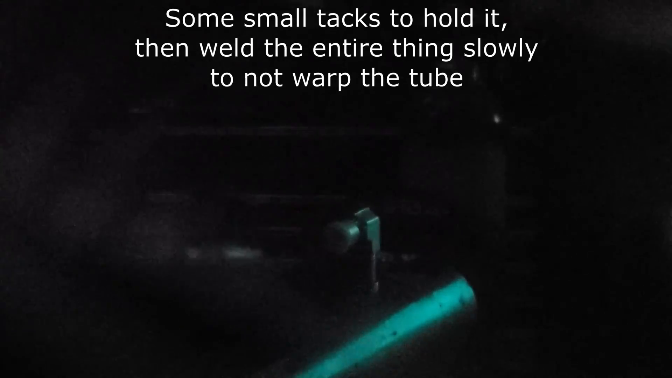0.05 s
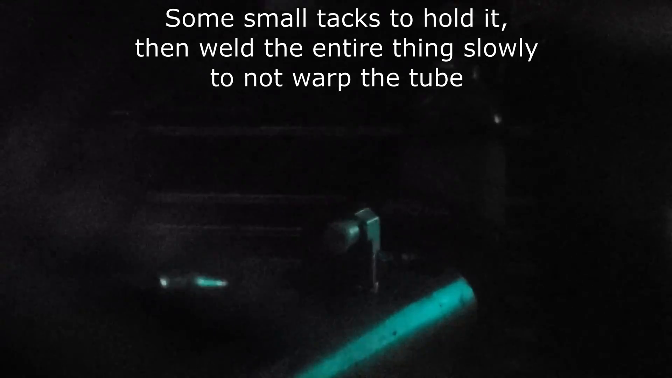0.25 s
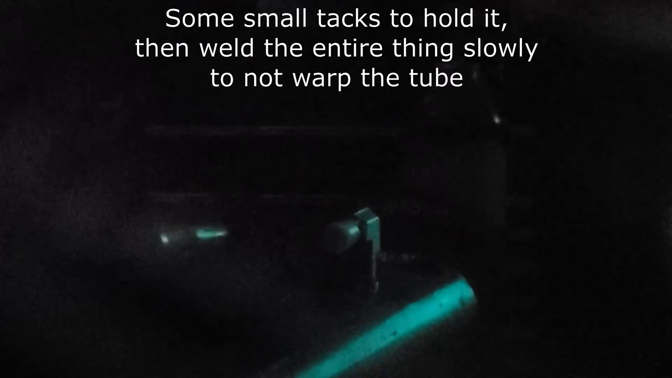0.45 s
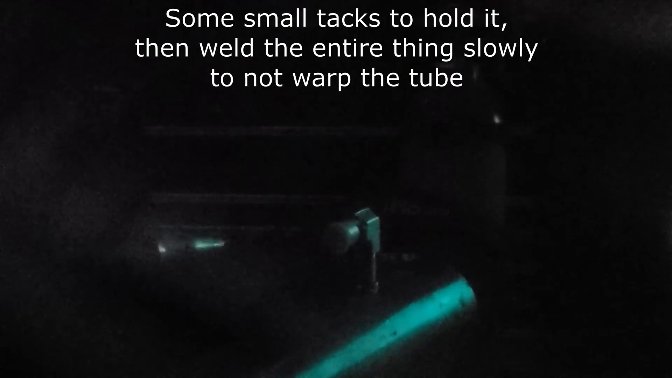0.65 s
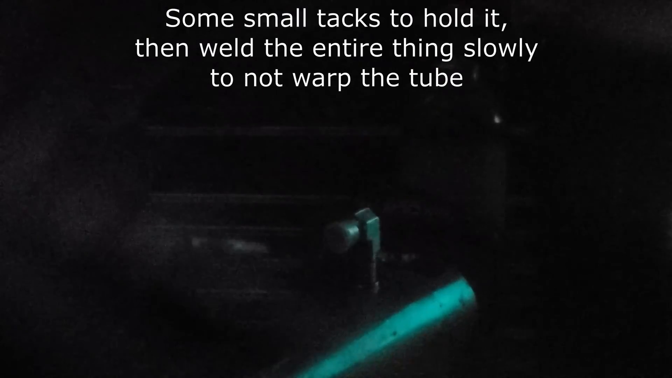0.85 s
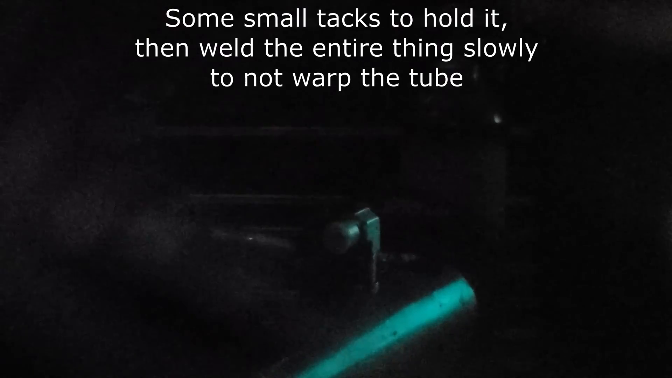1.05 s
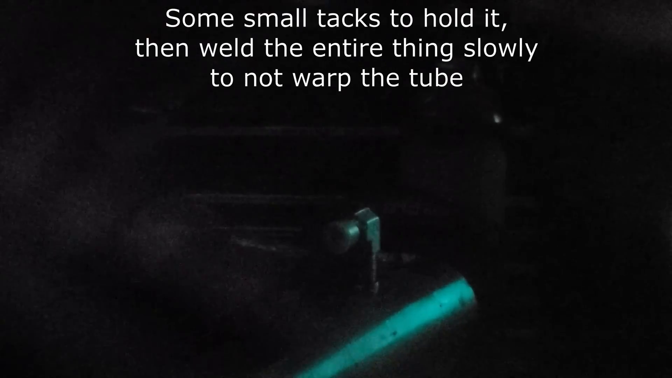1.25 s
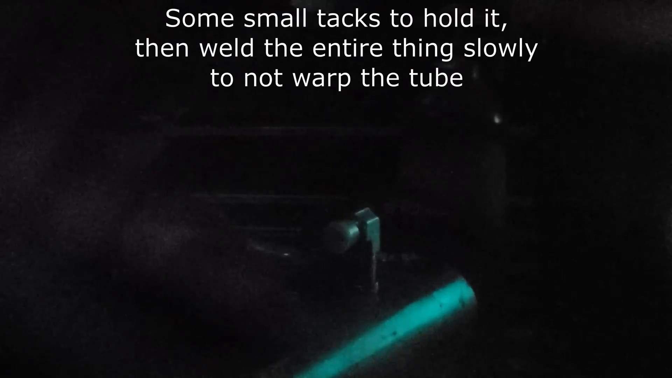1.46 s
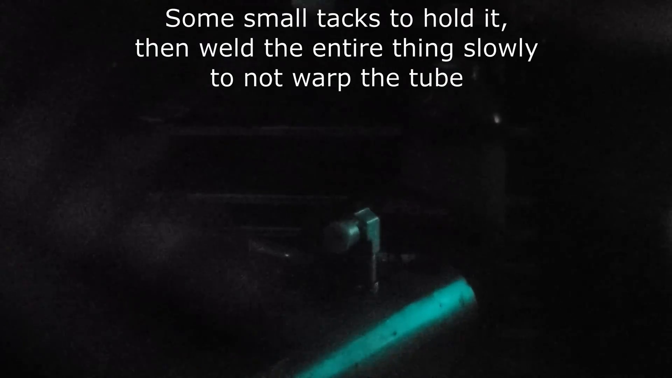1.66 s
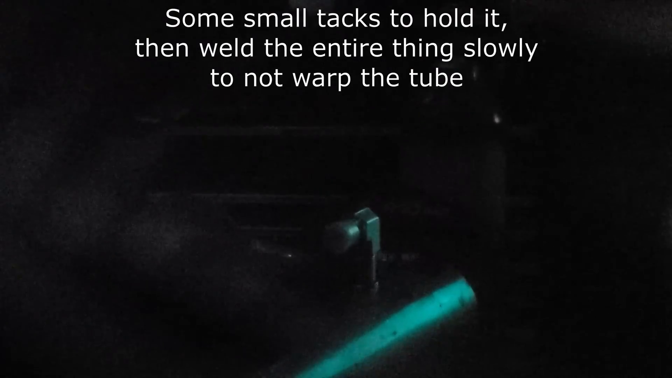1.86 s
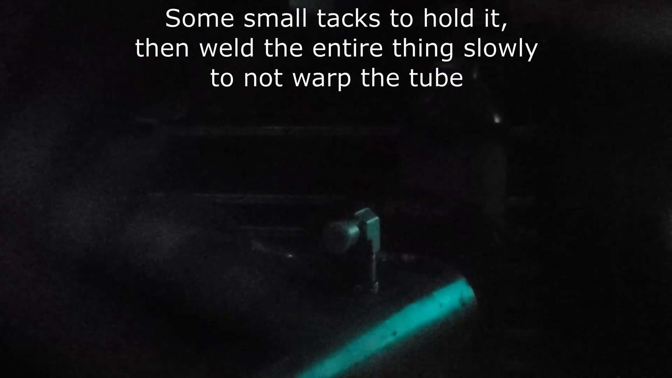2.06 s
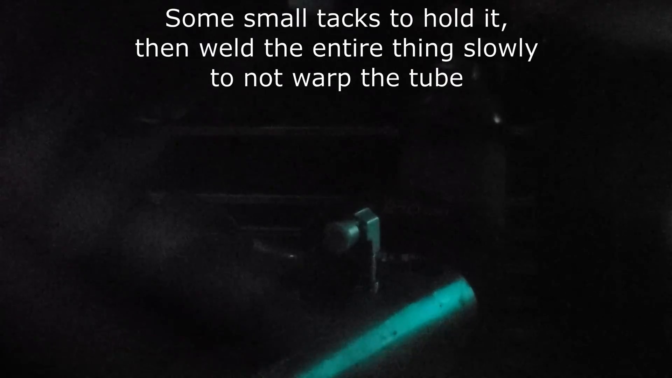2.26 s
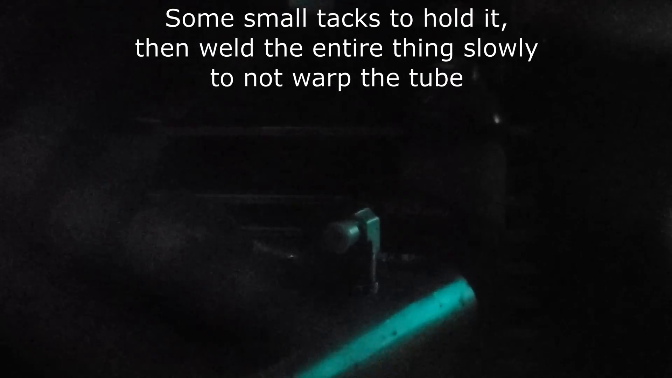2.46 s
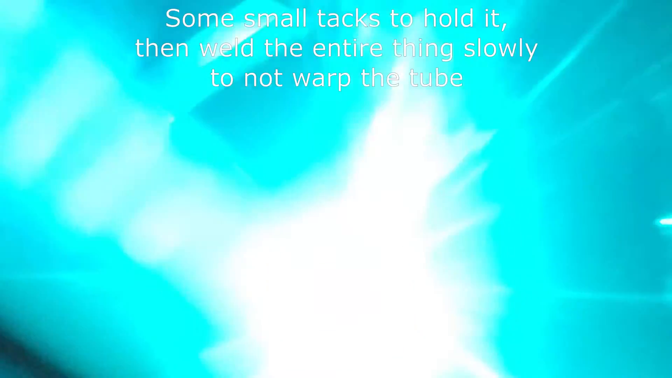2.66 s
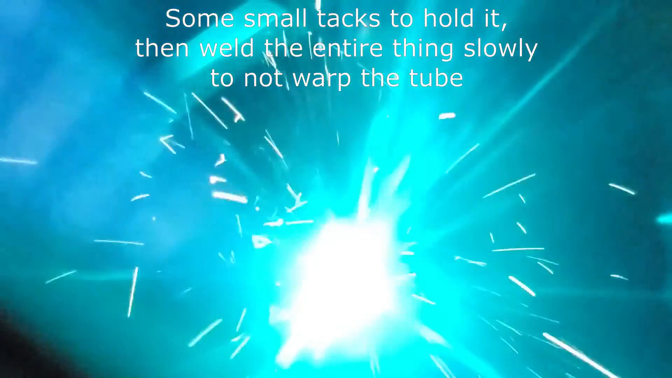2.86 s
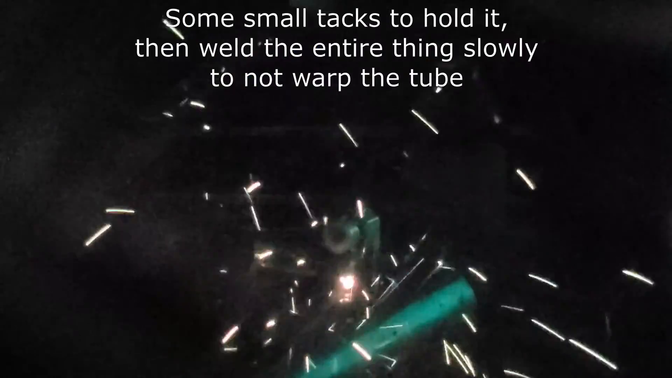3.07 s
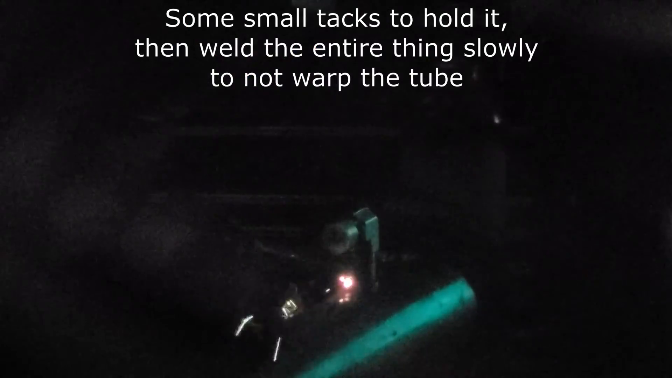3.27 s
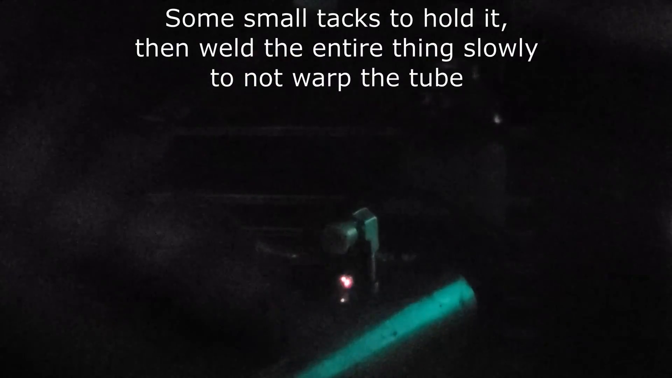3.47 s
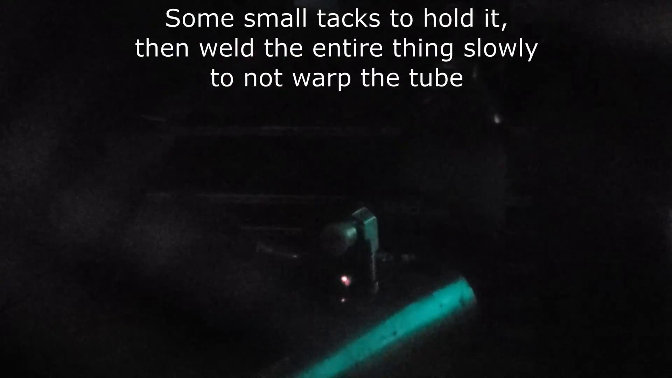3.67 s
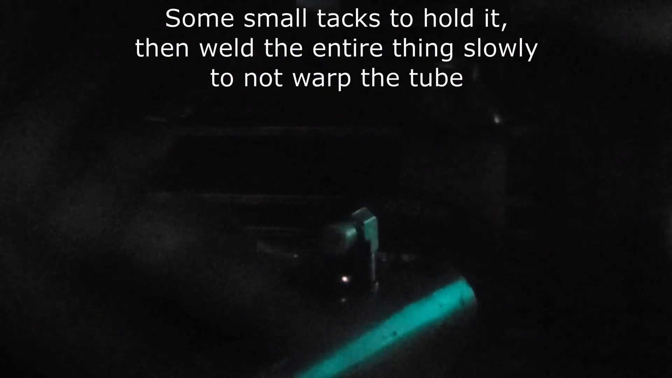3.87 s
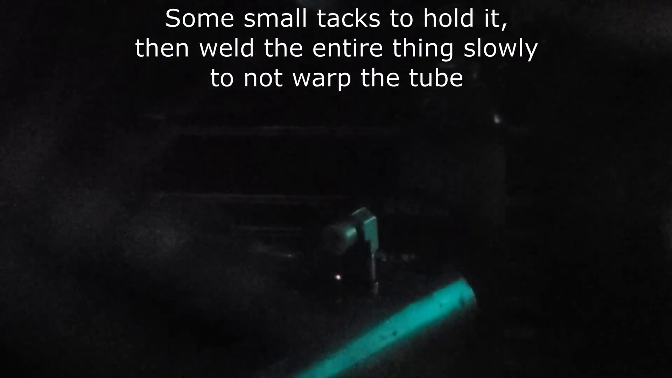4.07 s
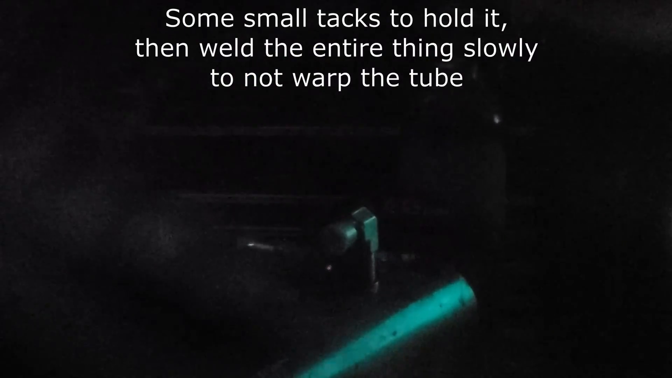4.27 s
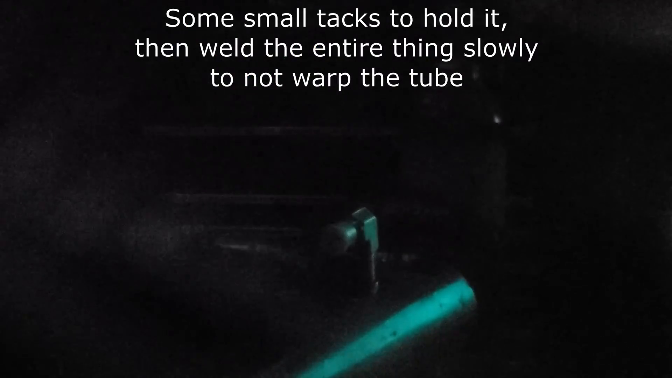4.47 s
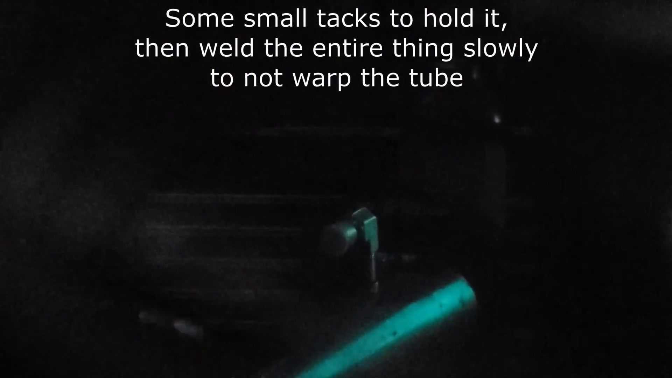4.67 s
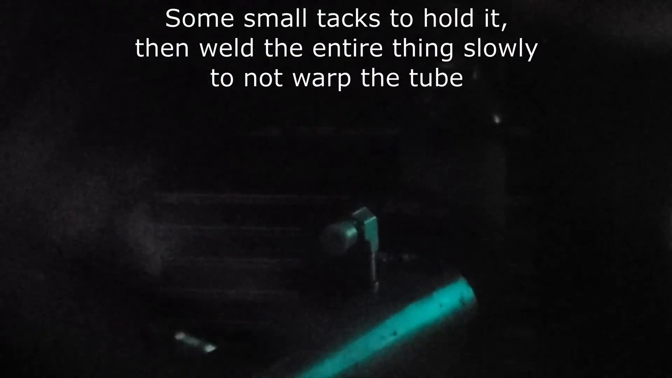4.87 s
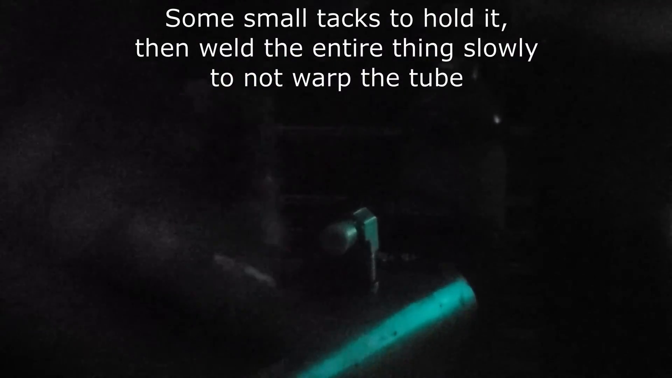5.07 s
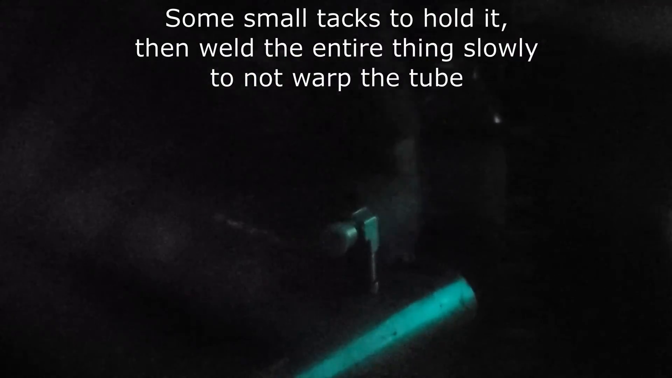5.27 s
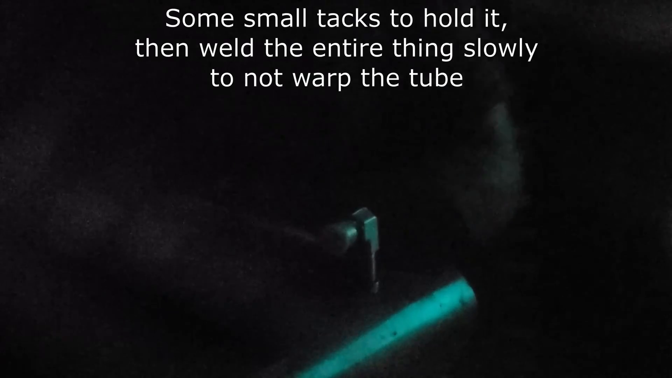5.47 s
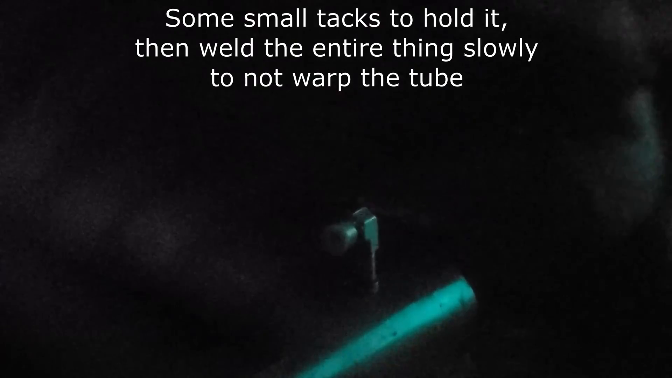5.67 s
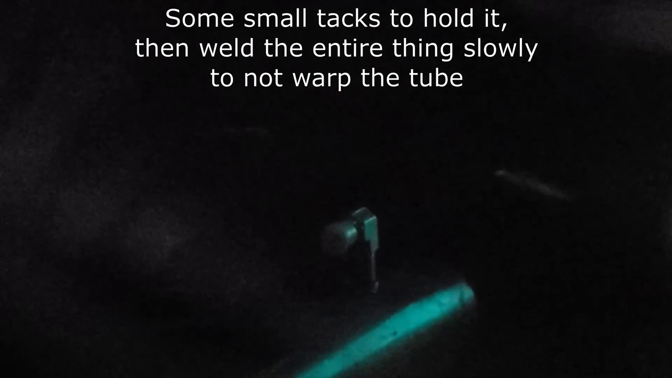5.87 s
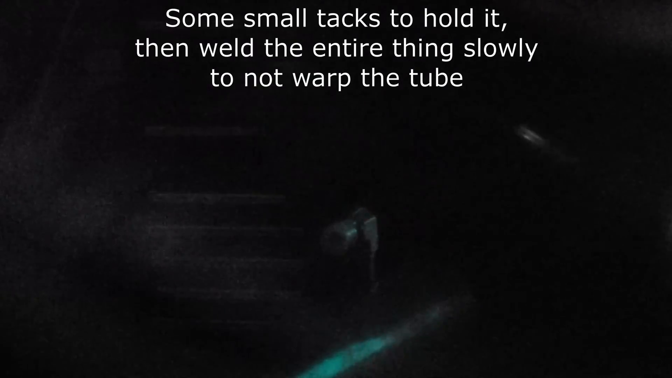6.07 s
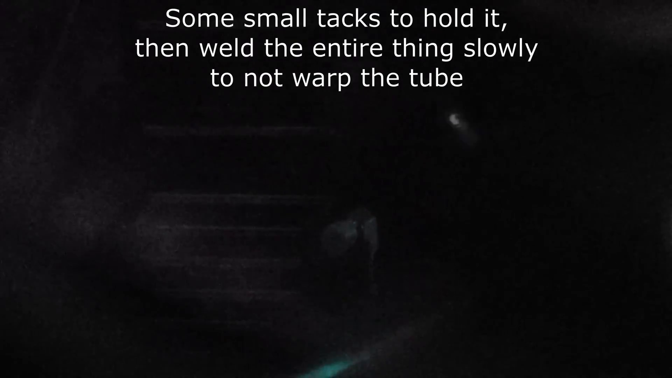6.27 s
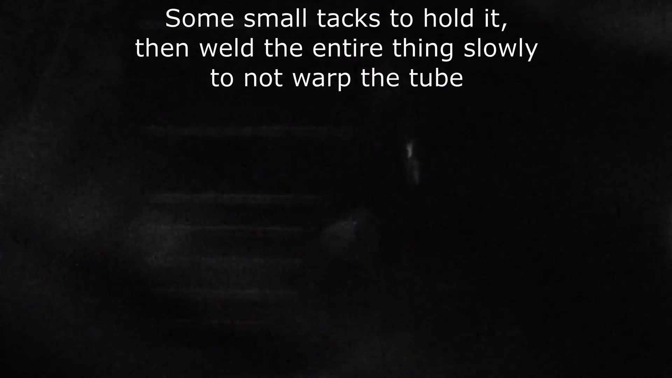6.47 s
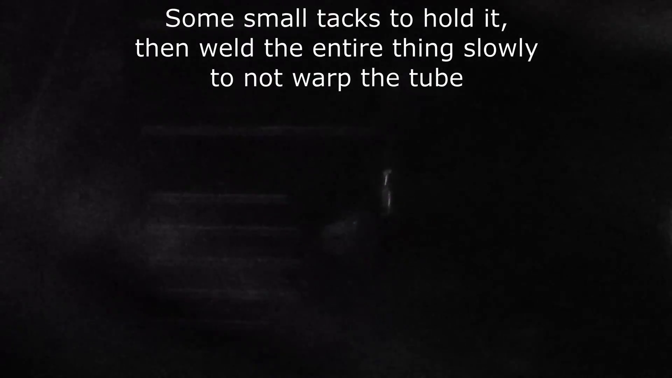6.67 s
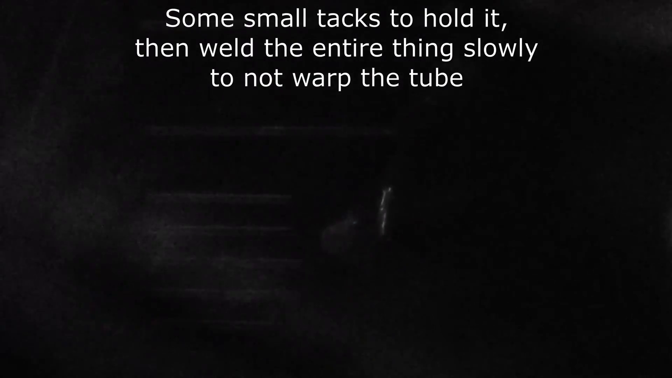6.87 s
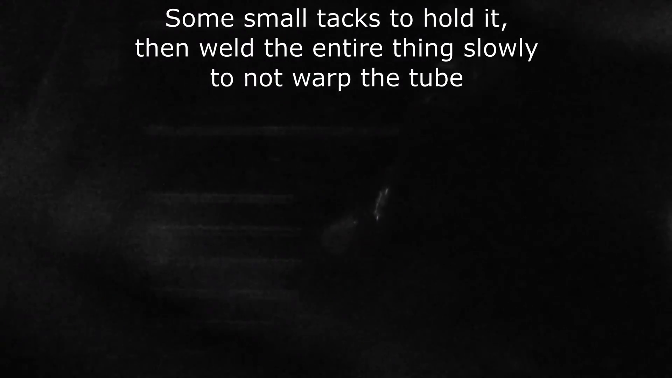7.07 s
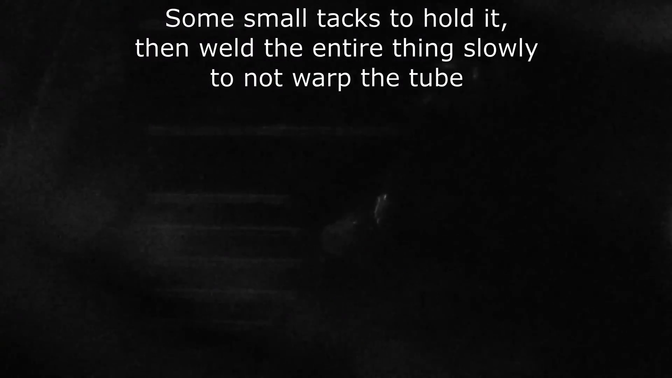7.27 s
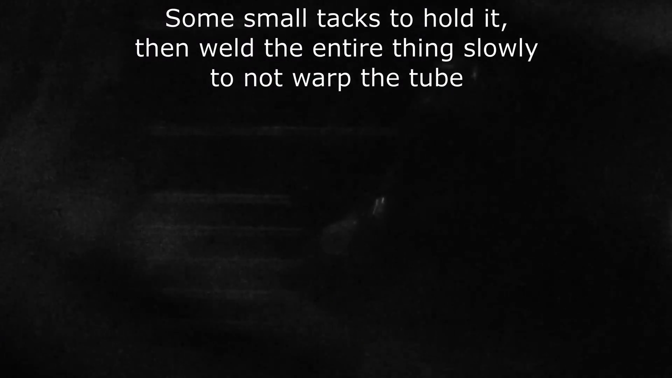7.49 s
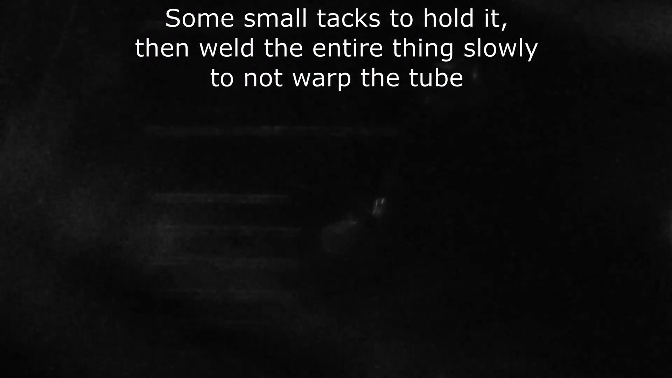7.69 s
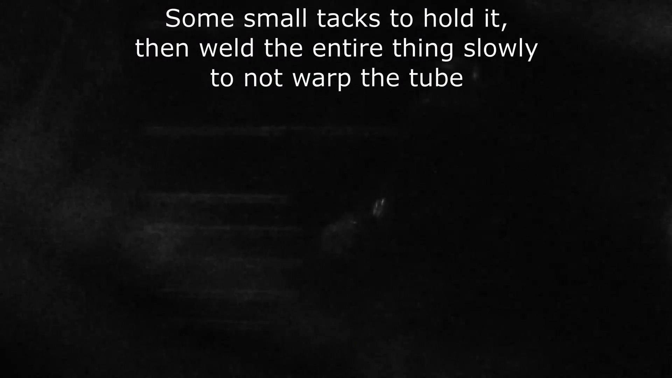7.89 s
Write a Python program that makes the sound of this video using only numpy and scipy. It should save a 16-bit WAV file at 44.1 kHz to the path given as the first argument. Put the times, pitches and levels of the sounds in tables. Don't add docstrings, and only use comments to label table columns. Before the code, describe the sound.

A welding machine's fan whirrs throughout, a breathy rush with thin motor tones, over uneven low traffic boom through workshop walls. Faint scuffs come at 0.25, 0.6 and 0.95 s. From about 1.2 to 2.3 s a lorry's deep engine note rises, pulls hard and eases off. Shielding gas starts hissing at 2.5 s. At 2.6 s the wire strikes with sharp snaps, thickening into fierce, dense crackling and sizzling until 3.0 s, then cutting off into a short room echo as the gas stops. The fan and traffic are ducked by the recorder, recovering after 4.1 s. At 4.4 s the torch lightly taps a tube, which rings briefly. Small knocks and scuffs continue between 4.8 and 6.9 s, clearest near 5.8 and 6.4 s. A car's falling, pulsing drone passes at 5.8-6.6 s. Fan and rumble carry on to 8 s. The close visor hollows the right side.

```python
import sys
import numpy as np
from scipy import signal
from scipy.io import wavfile
from scipy.ndimage import uniform_filter1d

SR = 44100
rng = np.random.default_rng(int(sys.argv[2]) if len(sys.argv) > 2 else 0)


def bounce(signal):
    frames = np.transpose(np.atleast_2d(signal))
    limited = np.clip(frames, -1, 1)
    pcm = np.round(limited * 32767).astype(np.int16)
    wavfile.write(sys.argv[1], SR, pcm)


def ratio_of_db(decibels):
    return 10 ** (np.asarray(decibels, float) / 20)


N = 349713

VISOR_S, VISOR_BOUNCE = 0.00075, 3.2
ARC_VISOR_S = 0.00072
STRIKE_S = 2.6137


def rms_one(x):
    return x / np.sqrt(np.mean(x ** 2) + 1e-20)


def since(s):
    return np.maximum(np.arange(N) / SR - s, 0)


def in_time(rows, outside=None):
    s, *columns = np.transpose(rows)
    return [np.interp(np.arange(N) / SR, s, column, outside, outside) for column in columns]


def drift(rate_hz):
    r = np.exp(-80 * np.pi * rate_hz / SR)
    slow = signal.lfilter([1], [1, -2 * r, r * r], rng.standard_normal(N // 40 + 2002))[2000:]
    return np.interp(np.arange(N) / 40, np.arange(len(slow)), rms_one(slow))


def resonance(x, hz, width_hz):
    r = np.exp(-np.pi * width_hz / SR)
    poles = [1, -2 * r * np.cos(2 * np.pi * hz / SR), r * r]
    return signal.lfilter([(1 - r * r) / 2, 0, (r * r - 1) / 2], poles, x)


def colour(x, table):
    hz, *sides = np.transpose(table)
    log_hz = np.log(np.fft.fftfreq(4096, 1 / SR) ** 2 + 1) / 2
    log_gain = [np.log(ratio_of_db(np.interp(log_hz, np.log(hz), db))) for db in sides]
    cepstrum = np.fft.ifft(log_gain).real
    fold = np.r_[1, 2 * np.ones(2047), 1, np.zeros(2047)]
    pulse = np.fft.ifft(np.exp(np.fft.fft(cepstrum * fold))).real[:, :2048]
    pulse /= np.sqrt(np.sum(pulse ** 2) / 2)
    return signal.oaconvolve(x, pulse, axes=1)[:, :x.shape[1]]


def both_ears(length):
    shared, left, right = rng.standard_normal((3, length))
    low, high = (signal.butter(1, 800, kind, fs=SR) for kind in ("low", "high"))
    return signal.lfilter(*low, shared) + signal.lfilter(*high, [left, right])


def visor(x, lag_s=VISOR_S):
    lag = round(lag_s * SR)
    bounced = (x + VISOR_BOUNCE * np.r_[np.zeros(lag), x[:-lag]]) / np.hypot(1, VISOR_BOUNCE)
    long_waves = signal.lfilter(*signal.butter(1, 600, fs=SR), x - bounced)
    return np.array([x, bounced + long_waves])


def workshop(x, near, far, lag_s):
    room_t60_s, treble_t60_s, room_db = 0.47, 0.39, -4.5
    t = np.arange(SR) / SR
    noise = both_ears(SR)
    dull = signal.lfilter(*signal.butter(2, 6500, fs=SR), noise)
    tail = dull * ratio_of_db(-60 * t / room_t60_s) + 1.04 * (noise - dull) * ratio_of_db(-60 * t / treble_t60_s)
    tail = colour(tail * (1 - np.exp(-t / 0.003)), far)
    tail /= np.sqrt(np.sum(tail ** 2) / 2)
    x = x + 1e-12 * rng.standard_normal(N)
    left, bounced = visor(x, lag_s)
    low, high = (signal.butter(4, 7600, kind, fs=SR, output="sos") for kind in ("low", "high"))
    right = signal.sosfilt(low, bounced) + signal.sosfilt(high, np.r_[0, x[:-1]])
    room = signal.oaconvolve(x[None], tail, axes=1)[:, :N]
    return colour(np.array([left, right]), near) + ratio_of_db(room_db) * room


# pitch_hz [Hz], left_db, right_db [dB per Hz]
FAN_RUSH = [(250, -76.5, -78.5), (340, -79.5, -85.5), (570, -84.5, -77), (800, -83, -81.5),
            (1340, -89, -76), (1620, -99, -85), (2280, -100, -86.5), (2700, -103, -89.5),
            (3000, -104, -94.5), (3350, -106, -89.5), (4250, -108.7, -94), (6800, -112, -99.6),
            (7180, -121.6, -108.8), (9550, -122.7, -119)]
# pitch_hz [Hz], level_db [dB]
FAN_TONES = [(446.8, -57), (466, -61), (624, -68), (727, -70), (766, -70), (893.6, -70), (1023, -64.5),
             (1065.5, -61), (1135, -70), (1277, -63), (1340.5, -68), (1397, -71), (1598, -71), (1680, -74),
             (1787, -74), (1863.8, -71), (1960, -78), (2234, -74), (2331, -75), (2681, -77), (3531, -84),
             (4350, -86)]


def fan():
    rush = 0.6 * visor(rng.standard_normal(N)) + 0.8 * both_ears(N)
    out = ratio_of_db(-47.5 + 0.41 * drift(17)) * colour(rush, FAN_RUSH)
    hz_at, left_db, right_db = np.transpose(FAN_RUSH)
    turning = np.cumsum(1 + 0.0006 * drift(3)) / SR
    chances = rng.uniform(-np.pi, np.pi, (len(FAN_TONES), 2))
    for (hz, db), (phase, skew) in zip(FAN_TONES, chances):
        right = ratio_of_db(0.63 * np.interp(hz, hz_at, right_db - left_db))
        apart = 0.6 * skew * min(hz / 1200, 1) ** 2
        wave = np.sin(2 * np.pi * hz * turning + phase + np.array([[0], [apart]]))
        centre = abs(1 + right * np.exp(1j * apart)) / 2
        out += np.sqrt(2) * ratio_of_db(db + 2.0 * drift(4)) * np.array([[1], [right]]) / centre * wave
    return out


# start_s [s],
# level_db [dB]
TRAFFIC = [(0, -39.5), (.75, -35), (1.4, -35), (1.6, -41), (2.05, -32.5), (2.4, -40.5), (2.72, -34.5),
           (2.9, -36.5), (3.1, -28.5), (3.35, -36), (4.2, -32.5), (4.85, -27), (5.22, -25), (5.4, -31),
           (5.75, -29.5), (5.95, -23.5), (6.4, -25), (6.7, -32.5)]
# start_s
# (centre) [s], length_s [s], deep_lift_db [dB], drone_lift_db [dB]
HEAVIES = [(.3, 0.23, 1, -2), (.7, 0.13, 3.5, -2), (2.285, .1, -2, 4.5), (2.855, 0.14, -10.5, 19),
           (3.502, 0.11, 6, -3.5), (4.282, 0.035, 8, 0), (4.801, .2, 1, 8), (5.54, 0.057, 11, -2.5),
           (5.669, 0.16, 6.5, 10.5), (5.88, .08, 7, 1.5), (6.515, 0.072, 5, -1.5), (6.998, 0.46, 3, 3),
           (7.85, 0.063, 5.5, -2)]


def road_levels():
    lumpy_db = 2.5
    near, t = in_time(TRAFFIC)[0], np.arange(N) / SR
    swing = near - near.mean()
    deep_lift = drone_lift = 0
    for s, length_s, deep_db, drone_db in HEAVIES:
        swell = np.exp(-((t - s) / length_s) ** 2)
        deep_lift = deep_lift + deep_db * swell
        drone_lift = drone_lift + drone_db * swell
    deep = -42.5 + 0.17 * swing + deep_lift + lumpy_db * drift(6)
    boom = near + 0.39 * lumpy_db * drift(6)
    drone = -48 + 0.5 * swing + drone_lift + lumpy_db * drift(4.1)
    return [deep, boom, drone]


# pitch_hz [Hz], width_hz [Hz], level_db [dB]
WALL_MODES = [
    [(45, 12, -8), (54, 14, 2)],
    [(87.24, 16.5, 3), (100.47, 12.7, 5.5), (115.8, 10, -13.5)],
    [(151.8, 21.2, 5.5), (212, 50, -2), (249.1, 30, -2), (285.7, 11, 0.5)],
]


def traffic():
    out = 0
    for level_db, modes in zip(road_levels(), WALL_MODES):
        road = rng.standard_normal(N + SR) + 0.19 * rng.standard_normal((2, N + SR))
        ringing = 0
        for hz, width_hz, db in modes:
            ringing = ringing + ratio_of_db(db) * resonance(resonance(road, hz, width_hz), hz, 2 * width_hz)
        boom = ringing[:, SR:]
        swing = uniform_filter1d(np.mean(rms_one(boom) ** 2, axis=0), 5000)
        steadied = boom / (swing + 0.046) ** 0.3
        out = out + ratio_of_db(level_db) * rms_one(steadied)
    return out * ratio_of_db([[0.45], [-0.45]])


# start_s [s], level_db [dB], length_s [s], dullness [0-1]
KNOCKS = [(0.254, -56, 0.013, 0.5), (0.578, -54, 0.038, 0.53), (.953, -64, .02, 0.4),
          (4.4095, -52.5, 0.044, 0.44), (4.803, -61.5, 0.14, 0.23), (5.463, -61, 0.018, 0.56),
          (5.751, -58, 0.18, 0.52), (5.778, -48.5, .006, 0.85), (6.043, -57, .03, 0.5),
          (6.4325, -44, 0.0091, 0.91), (6.444, -53, 0.011, 0.77), (6.632, -57.5, 0.051, 0.5),
          (6.811, -51.5, 0.046, 0.84), (6.846, -52, 0.054, 0.54)]


def knocks():
    x, t = np.zeros(N + SR), np.arange(SR // 4) / SR
    for s, db, length_s, dull in KNOCKS:
        noise = rng.standard_normal(len(t))
        scuff = rms_one(signal.lfilter([1], [1, -2 * dull, dull ** 2], noise))
        fade = np.exp(-t / length_s) + 1.6 * np.exp(-t / 0.0012)
        x[round(s * SR):][:len(t)] += ratio_of_db(db) * scuff * fade
    return x[:N]


# start_s [s], firing pitch_hz [Hz], level_db [dB]
LORRY = [
    (1.15, 36, -59),
    (1.3, 40.8, -41),
    (1.5, 54.6, -52),
    (1.62, 55.44, -32),
    (1.85, 54, -42),
    (1.96, 54.3, -37),
    (2.12, 49.8, -46),
    (2.3, 43.5, -62),
]


def lorry():
    hz, db = in_time(LORRY)[0], in_time(LORRY, -200)[1]
    turn = 2 * np.pi * np.cumsum(hz) / SR
    third = ratio_of_db(-51.5 + 0.9 * np.minimum(db + 45, 0) + 1.5 * drift(5))
    return np.sqrt(2) * (ratio_of_db(db) * np.sin(turn) + third * np.sin(3 * turn))


# pitch_hz [Hz], left_db, right_db [dB per Hz]
GAS = [(400, -81, -84), (972, -86, -81), (1610, -80.5, -61.5), (2500, -90, -80.5), (3720, -78.5, -71.5),
       (4300, -89.5, -76), (5960, -85, -71.5), (7500, -100.5, -89), (9500, -79, -75), (11100, -90, -87.5),
       (13000, -78, -77), (15000, -97.5, -81.5)]


def gas():
    opens_s, shuts_s, rise_s, fall_s = 2.516, 3.02, 0.013, 0.07
    jet = 0.57 * visor(rng.standard_normal(N)) + 1.2 * both_ears(N)
    flow = (1 - np.exp(-since(opens_s) / rise_s)) * np.exp(-(since(shuts_s) / fall_s) ** 2)
    return flow * ratio_of_db(-39 + drift(40)) * colour(jet, GAS)


# start_s [s], energy level_db [dB]
POPS = [(2.6137, -3), (2.6259, -0.3), (2.6605, -6.3), (2.6984, -6.9), (2.7137, -1.1), (2.7158, 0.7),
        (2.723, 3.2), (2.7465, -0.5), (2.7675, 2.4), (2.7741, 1.0), (2.7807, -2.5), (2.7868, 0.8),
        (2.7911, 2.0), (2.7994, -1.9), (2.8063, -3.1), (2.8148, -3.5), (2.8273, 2.6), (2.8398, -3.8),
        (2.8565, -3.3), (2.8731, -3.1), (2.8817, -0.6), (2.8871, -1.3), (2.9071, -0.8), (2.9159, 0.2),
        (2.9221, -2.1), (2.9333, -1.8), (2.94, 0.4), (2.9931, -2.5), (3.0093, 2.7), (3.0307, -8.5)]


def droplets():
    drip_s, drip_db, steady_from_s, steady_to_s = 0.008, -5.5, 2.76, 3.0
    rows = list(POPS)
    for (a, _), (b, _) in zip(POPS, POPS[1:]):
        steady = steady_from_s < a and b < steady_to_s
        steps = round((b - a) / drip_s) if steady else 1
        for k in range(1, steps):
            s = a + (b - a) * (k + rng.uniform(-0.25, 0.25)) / steps
            rows.append((s, drip_db + rng.normal()))
    cold_until_s = POPS[6][0]
    pops = []
    for s, db in rows:
        cold_db = -5 * (STRIKE_S < s < cold_until_s)
        pops.append((s, db, -14 - 0.5 * db + cold_db + 2 * rng.normal()))
    return pops


# start_s [s], level_db [dB]
SIZZLE = [
    (2.6137, -20),
    (2.635, -25.5),
    (2.70, -30),
    (2.712, -22),
    (2.722, -32.5),
    (2.79, -26),
    (2.85, -29),
    (2.92, -23.5),
    (3.012, -29.5),
]


def sizzle():
    pool_s, thin_start, thin_grows_s, thin_after = 2.706, 0.43, 0.03, 0.07
    quench_db_per_s = 3301
    sizes = ratio_of_db(3.5 * np.minimum(rng.exponential(1, N), 3)) * rng.choice([-1, 1], N)
    snaps_per_s = 2500 * ratio_of_db(4 * drift(60))
    snaps = rms_one(sizes * (rng.random(N) < snaps_per_s / SR))
    hiss = rng.standard_normal(N) * ratio_of_db(4.5 * drift(120))
    full = 0.75 * snaps + 0.5 * hiss
    body = signal.lfilter(*signal.butter(1, 4500, fs=SR), full)
    thinning = 1 - (1 - thin_start) * np.exp(-since(STRIKE_S) / thin_grows_s)
    thin = np.where(since(pool_s) > 0, thin_after, thinning)
    power_db = in_time(SIZZLE)[0] - quench_db_per_s * since(SIZZLE[-1][0])
    return (since(STRIKE_S) > 0) * ratio_of_db(power_db) * (full - thin * body)


def arc():
    strike_db, strike_hz = 2.5, 666
    x, t = np.zeros(N), np.arange(300) / SR
    thump = np.sin(2 * np.pi * strike_hz * t) * np.exp(-t / 0.00032)
    thump /= np.linalg.norm(thump)
    for s, db, thump_db in droplets():
        crack = 0.2 * rng.standard_normal(300) * np.exp(-t / 0.0008) + (t == 0)
        burst = crack / np.linalg.norm(crack) + ratio_of_db(thump_db - 2) * thump
        x[round(s * SR):][:300] += ratio_of_db(db + 4) * burst
    x[round(STRIKE_S * SR):][:300] += ratio_of_db(strike_db) * thump
    return x + sizzle()


# pitch_hz [Hz], level_db [dB], t60_s [s]
TUBE = [
    (1500, -53.5, 0.041),
    (1770, -60, 0.23),
    (2710, -58, 0.2),
]


def tap():
    t = since(4.4105)
    return sum(ratio_of_db(db - 60 * t / t60_s) * np.sin(2 * np.pi * hz * t) for hz, db, t60_s in TUBE)


def passing_car():
    start_s, length_s, engine_hz, sag_hz_per_s = 5.8, 1, 117, 43
    rise_s, fades_s, fade_db_per_s, beat_db, beats_per_s = 0.05, 6.27, 54, 1.5, 5.44
    t = since(start_s)
    hz = engine_hz - sag_hz_per_s * np.minimum(t, length_s)
    db = -25 - fade_db_per_s * since(fades_s) - beat_db * np.cos(2 * np.pi * beats_per_s * t)
    swell = np.minimum(t / rise_s, 1) * ratio_of_db(db)
    note = np.sqrt(2) * swell * np.sin(2 * np.pi * np.cumsum(hz) / SR)
    return note * ratio_of_db([[0.45], [-0.45]])


def ducking():
    duck_s, duck_db, attack_s, recover_s, recover_tau_s = 2.69, -13, 0.04, 4.123, 0.26
    drop = 1 - np.exp(-since(duck_s) / attack_s)
    return duck_db * drop * np.exp(-since(recover_s) / recover_tau_s)


# pitch_hz [Hz], left_db, right_db [dB per Hz]
ARC = [(130, -8, -8), (500, 6.5, 2), (1000, 3.5, 6.5), (1600, 2, 11.5), (2100, 1.5, 5), (3000, 6, -1),
       (4450, 9.2, 17.5), (5800, 10.5, 16.5), (6800, 9.5, 10), (7700, 1.5, 1), (8900, 9.5, 8),
       (10800, 4.5, 1), (13500, 0, -3), (14700, 8, 11.5)]
# pitch_hz [Hz], left_db, right_db [dB per Hz]
WALLS = [(110, -27.5, -24.5), (300, -12.5, -14.5), (670, -15, -8.5), (1080, -6.5, -3.5), (1600, -14, 3.5),
         (2110, -9, -4.5), (2700, -10.5, -1), (3450, -10, -1.5), (4400, -6, 0), (6000, -10, -.5),
         (7500, -14, -10), (8960, -15, -9.5), (11500, -10, -7), (15040, -18, -8)]
# pitch_hz [Hz], left_db, right_db [dB per Hz]
BENCH = [(200, -6, -11.5), (700, -0.5, 5.5), (1610, -12, 5), (2110, -8.5, -4), (2700, -14.5, 0),
         (5000, -15, -3.5), (8000, -24.5, -13.5), (12000, -19.5, -20), (15000, -21.5, -22.5)]


def scene():
    near = in_time(TRAFFIC)[0]
    wash = ratio_of_db(0.1 * (near - near.mean()))
    steady = wash * fan() + traffic() + passing_car() + lorry() + gas()
    bench = workshop(knocks() + tap(), BENCH, BENCH, VISOR_S)
    return workshop(arc(), ARC, WALLS, ARC_VISOR_S) + bench + ratio_of_db(ducking()) * steady


def top_cut(x):
    return signal.sosfilt(signal.butter(12, 16820, fs=SR, output="sos"), x)


def record(dry):
    hollow_s, ring = 0.001134, 0.19
    lag = round(hollow_s * SR)
    hollow = signal.lfilter([np.sqrt(1 - ring ** 2)], np.r_[1, np.zeros(lag - 1), -ring], dry[1])
    bass = signal.lfilter(*signal.butter(2, 900, fs=SR), dry[1] - hollow)
    rounded = 1.1 * np.tanh(np.array([dry[0], hollow + bass]) / 1.1)
    cut = signal.sosfilt(signal.ellip(12, 0.5, 70, 15780, fs=SR, output="sos"), rounded)
    mix = signal.sosfilt(signal.butter(2, 32, "high", fs=SR, output="sos"), cut)
    return top_cut(mix)


dry = scene()
out = record(dry)
bounce(out)
```